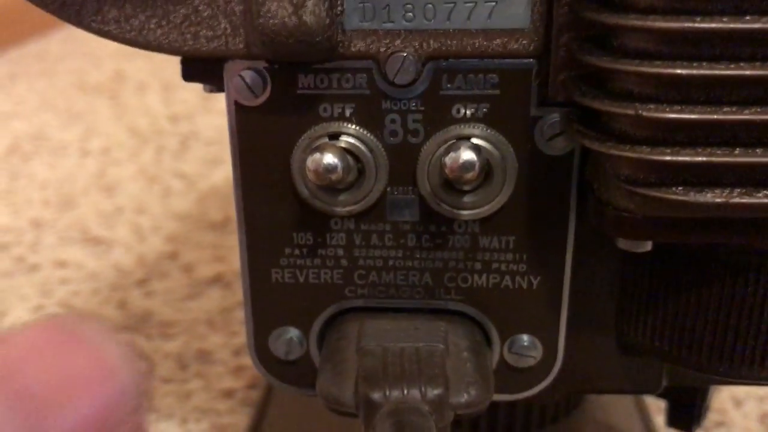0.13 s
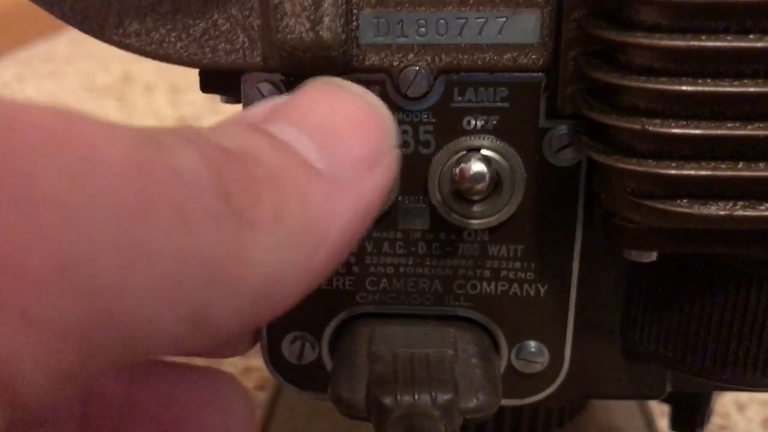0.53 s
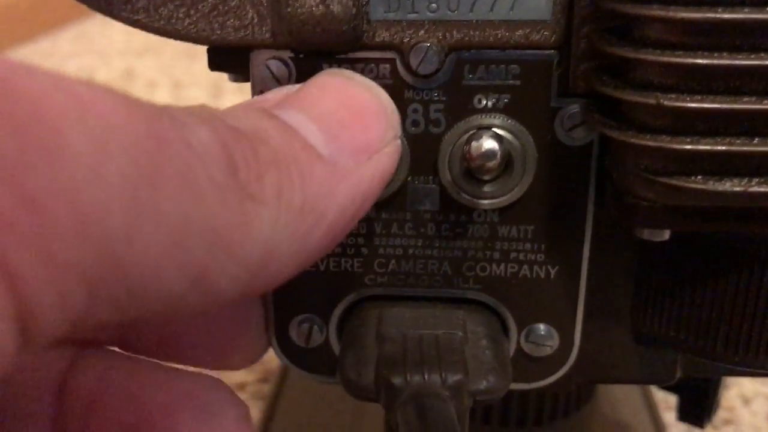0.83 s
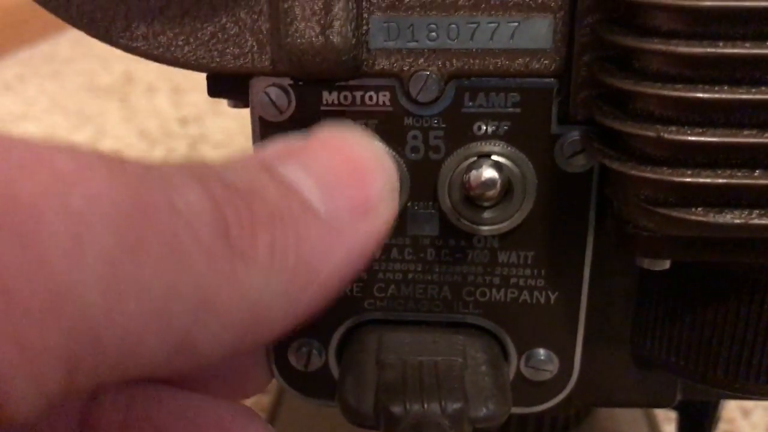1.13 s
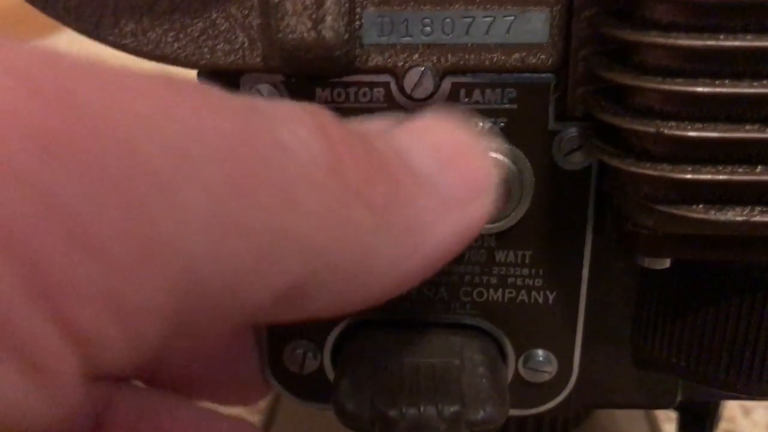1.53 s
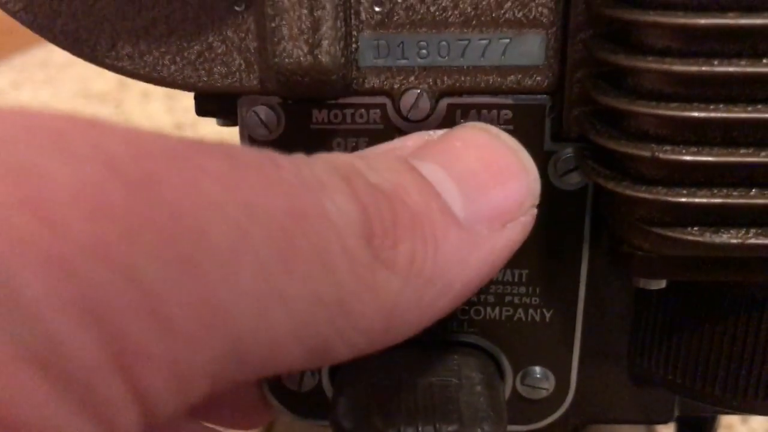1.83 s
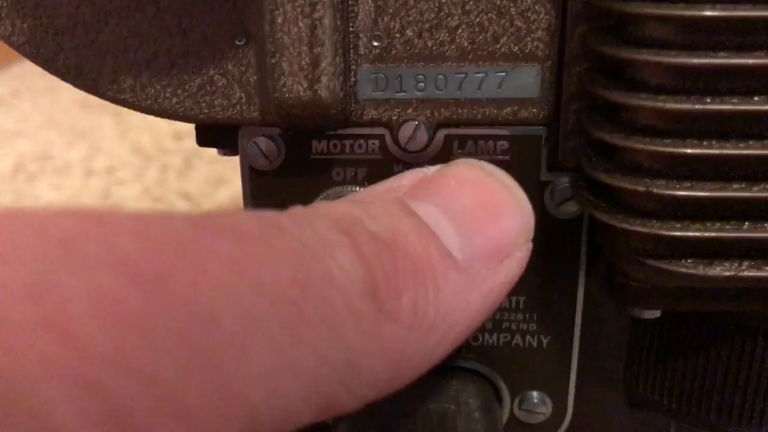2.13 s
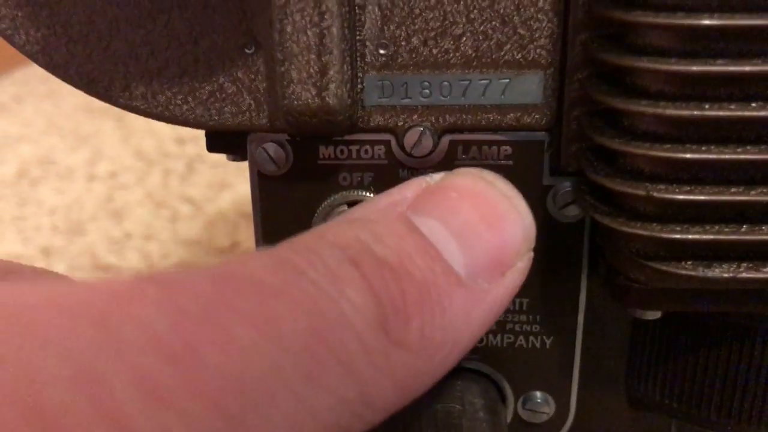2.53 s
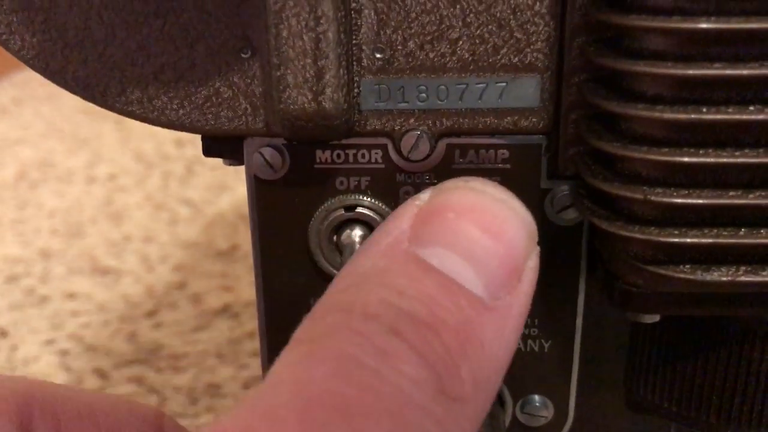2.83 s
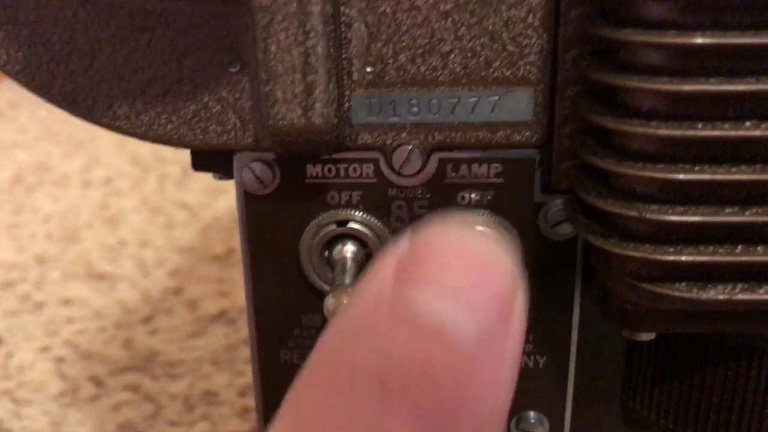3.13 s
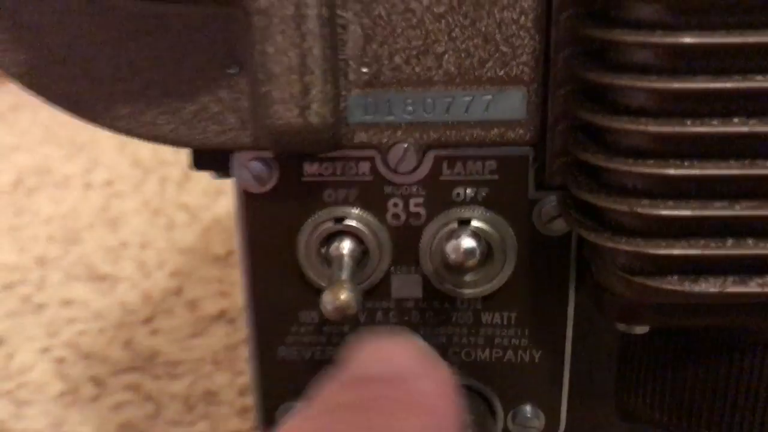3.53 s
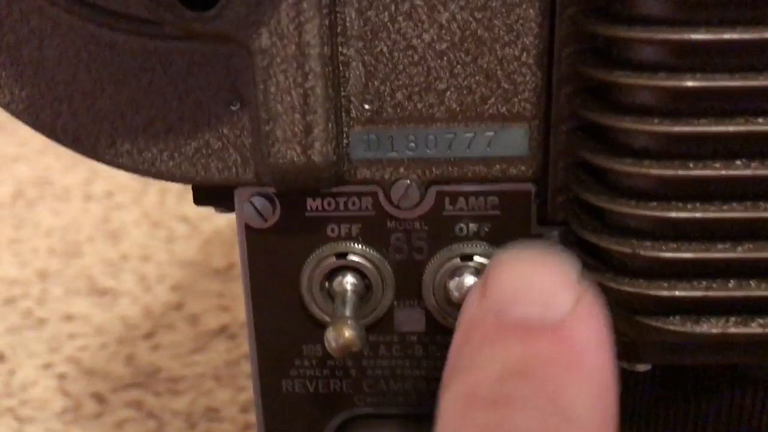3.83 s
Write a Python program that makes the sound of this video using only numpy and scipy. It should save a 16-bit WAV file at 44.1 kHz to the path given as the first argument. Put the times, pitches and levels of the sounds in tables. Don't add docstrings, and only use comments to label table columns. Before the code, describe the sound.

Near silence with light ticks, then a hard switch click; a small electric motor whirs up, its dry belt chirping rapidly, and holds a rough, steady whir, heard very close in a quiet room.

```python
import sys
import numpy as np
from scipy import signal
from scipy.fft import rfft, irfft
from scipy.io import wavfile

SR = 44100
rng = np.random.default_rng(int(sys.argv[2]) if len(sys.argv) > 2 else 0)


def master_out(mix):
    frames = np.transpose(np.atleast_2d(mix))
    ceiling = np.clip(frames, -1, 1)
    pcm = np.round(ceiling * 32767).astype(np.int16)
    wavfile.write(sys.argv[1], SR, pcm)


def invert_db(x):
    u = np.asarray(x, float) / 20
    return 10 ** u


N = 176400

START_S, TOP_HZ = 1.3046, 100.24


def at_hz(points, hz):
    table_hz, values = np.array(points).T
    return np.interp(np.log(hz), np.log(table_hz), values)


def rms_one(x):
    return x / np.sqrt(np.mean(x ** 2) + 1e-20)


def drift(rate_hz):
    r = np.exp(-80 * np.pi * rate_hz / SR)
    slow = signal.lfilter([1], [1, -2 * r, r * r], rng.standard_normal(N // 40 + 2002))[2000:]
    return np.interp(np.arange(N) / 40, np.arange(len(slow)), rms_one(slow))


def coloured(points, peaks=()):
    hz = np.maximum(np.arange(N // 2 + 1) * SR / N, 1)
    db = at_hz(points, hz)
    for centre, width, gain_db in peaks:
        db = db + gain_db / (1 + (2 * (hz - centre) / width) ** 2)
    white = rfft(rng.standard_normal(N))
    noise = irfft(white * invert_db(db) * (hz > 15), N)
    return hz, rfft(rms_one(noise))


def butter(x, order, hz, kind):
    return signal.sosfilt(signal.butter(order, hz, kind, fs=SR, output="sos"), x)


def ring(clicks, hz, t60):
    r, w = invert_db(-60 / (t60 * SR)), 2 * np.pi * hz / SR
    return signal.lfilter([0, np.sin(w)], [1, -2 * r * np.cos(w), r * r], clicks + 1e-18)


def room_hush():
    # f/Hz, level/dB per Hz
    murmur = [(22, -43), (62, 4), (95, -18.5), (130, -9), (170, -18.5), (400, -25), (1000, -32),
              (16000, -40)]
    _, spectrum = coloured(murmur, [(10600, 900, -8)])
    level_db = -63 - 2.5 * np.arange(N) / SR
    return invert_db(level_db) * irfft(spectrum, N)


def switch():
    # t/s, level/dB, length/s
    snaps = [
        (.139, -57, 0.0011),
        (.611, -62, .001),
        (1.2503, -56, .0015),
        (1.2518, -45.5, .001),
        (1.263, -50, .002),
        (1.2705, -39, .002),
        (1.2735, -3.5, 0.00077),
        (1.2747, -3, 0.00081),
        (1.2759, -7.5, 0.00079),
        (1.2778, -20, 0.00083),
    ]
    # f/Hz, level/dB, time to die by 60 dB/s
    plate_modes = [(565, -1, 0.04), (836, -18, 0.05), (1153, 0, 0.043), (1470, -2.5, 0.024),
                   (2164, 1, 0.02), (3490, -11, 0.031), (4190, -12.5, 0.016), (4940, -0.5, 0.013),
                   (5810, 7.5, 0.0051), (6460, 7, 0.0068), (7230, -3, 0.025), (8380, -11, 0.01),
                   (9400, 0, 0.0092), (11040, 2, 0.0075)]
    crack_db, tail_db, tail_t60_s = -1.5, -45, 0.28
    t = np.arange(N) / SR
    loudness, clicks = np.zeros(N), np.zeros(N)
    for s, db, length in snaps:
        loudness += invert_db(db) * (t >= s) * np.exp(-np.maximum(t - s, 0) / length)
        clicks[int(s * SR)] = invert_db(db)
    burst = rng.standard_normal(N) * loudness
    plate = sum(invert_db(db - 14.5) * ring(clicks, hz, t60) for hz, db, t60 in plate_modes)
    crack = invert_db(crack_db) * butter(burst, 2, [3200, 11000], "band")
    direct = butter(plate + crack, 6, 470, "high")
    tail = signal.lfilter([.5], [1, -.5], rng.standard_normal(SR // 2))
    tail = tail * invert_db(-60 * t[:SR // 2] / tail_t60_s)
    into_room = .5 * direct + butter(burst, 2, [500, 9000], "band")
    return direct + invert_db(tail_db) * signal.fftconvolve(into_room, tail)[:N]


def hand():
    # t/s, length/s, level/dB
    brushes = [
        (.66, .05, -80),
        (.9, 0.053, -72),
    ]
    # t/s, level/dB, f/Hz
    bumps = [
        (2.64, -37, 125),
        (2.66, -39, 81.5),
        (3.17, -42, 69),
        (3.4, -38.5, 143.5),
    ]
    t = np.arange(N) / SR
    thuds, rubbing = np.zeros(N), np.zeros(N)
    for s, db, hz in bumps:
        thuds += invert_db(db) * np.exp(-((t - s) / 0.045) ** 2) * np.sin(2 * np.pi * hz * t)
    for s, length, db in brushes:
        rubbing += invert_db(db) * np.exp(-(2 * (t - s) / length) ** 4)
    return thuds + rng.standard_normal(N) * rubbing


def shaft():
    runup_s, creep_from_s, creep_hz_per_s = .315, 2.3, .9
    t = np.arange(N) / SR
    runup = TOP_HZ * (1 - np.exp(-np.maximum(t - START_S, 0) / runup_s))
    speed = runup + creep_hz_per_s * np.maximum(t - creep_from_s, 0)
    return speed, np.cumsum(speed) / SR


def casing_knocks():
    per_s, hz = 17, 1058
    hits = (rng.random(N) < per_s / SR) * rng.standard_normal(N) * invert_db(2)
    return ring(hits, hz, 0.032) - 0.68 * ring(hits, 1.75 * hz, .015) + 0.48 * ring(hits, 3.1 * hz, .008)


def fan(speed, turns):
    # t/s, level/dB
    air = [(1.33, -44.5), (1.46, -32.5), (1.66, -26), (1.88, -24.5), (2.02, -23.5), (2.03, -22.5),
           (2.04, -23), (3.98, -22.5), (4.0, -22.5)]
    # f/Hz, level/dB per Hz
    air_colour = [(30, -28.5), (90, -17), (300, -15.5), (700, -10), (1600, -11), (3000, -19.5),
                  (7000, -17.5), (16000, -30.5)]
    # f/Hz, extra loss/dB per dB of missing speed
    speed_share = [(60, 1), (300, 0.13), (1000, 0.07), (2500, 0.52), (6000, 0.85), (14000, 0.81)]
    # f/Hz, width/Hz, level/dB
    casing = [(1049, 410, 10), (1850, 100, 2.5), (3585, 420, 6), (4380, 100, -10.5), (5350, 150, -2.5),
              (5830, 1000, 5.5), (6600, 630, -2), (7740, 590, -7.5), (9600, 620, 1.5), (10520, 510, -6)]
    patchy_db, beat = 0.63, 0.083
    t = np.arange(N) / SR
    level_db = np.interp(t, *np.transpose([(START_S - .02, -95)] + list(air)))
    lack_db = 20 * np.log10(np.maximum(speed, 8) / TOP_HZ)
    hz, spectrum = coloured(air_colour, casing)
    stream, shared = np.zeros(N), drift(3.6)
    for k in range(10):
        place = np.clip(np.log2(hz / 31.25) - k, -1 if k else 0, 1 if k < 9 else 0)
        band = irfft(spectrum * np.cos(np.pi / 2 * place) ** 2, N)
        flicker_db = patchy_db * (0.37 * shared + drift(31))
        stream += band * invert_db(at_hz(speed_share, 40.0 * 2 ** k) * lack_db + flicker_db)
    beating = 1 + beat * np.cos(2 * np.pi * turns)
    return invert_db(level_db) * (stream * beating + casing_knocks())


def tones(speed, turns):
    # cycles per turn, level/dB rms, favoured shaft speed/Hz, width of that favour/Hz
    hums = [(1, -49, 98, 30), (8, -41, 88, 13), (8.3, -36, 70, 8), (12, -42, 82, 18), (16.67, -37, 83, 7),
            (20.4, -41, 90, 8), (22.8, -45, 93, 9), (24, -35.5, 85, 8.5), (25.42, -38, 81, 8),
            (32, -51, 80, 12), (36, -50, 66, 16), (48, -52, 46, 10)]
    waver_db, jitter, jitter_rate_hz = 1.6, .45, 10
    out = np.zeros(N)
    for per_turn, db, best, width in hums:
        level = np.sqrt(2) * invert_db(db + waver_db * drift(13.5))
        swell = speed / best / (1 + ((speed - best) / width) ** 2)
        out += level * swell * np.sin(2 * np.pi * per_turn * turns + jitter * drift(jitter_rate_hz))
    return out


def faint_squeaks(turns):
    count = np.arange(21, int(turns[-1]) - 1)
    luck = rng.standard_normal((len(count), 2))
    start_s = np.searchsorted(turns, count + .15) / SR
    db = -35 - .025 * count + 4 * luck[:, 0]
    return np.c_[start_s, db, 14900 + 600 * luck[:, 1]]


def squeaks(speed, turns):
    # t/s, peak level/dB, centre f/Hz
    strong = [(1.4007, -44, 12900), (1.4247, -22.5, 14000), (1.4546, -20, 12900), (1.479, -17, 13200),
              (1.502, -19, 14000), (1.5209, -18, 12500), (1.541, -20, 13000), (1.5604, -21, 14000),
              (1.5775, -19, 12400), (1.5944, -23, 13300), (1.6247, -20.5, 12900), (1.6414, -26, 13400),
              (1.6576, -26, 13700), (1.6711, -25, 13200), (1.6864, -27, 14100), (1.6995, -24, 14500),
              (1.713, -21.5, 13600), (1.7274, -26, 13100), (1.7414, -28, 13000), (1.7534, -24, 13300),
              (1.7789, -25, 13000), (1.7923, -22, 13100), (1.8542, -27, 13300), (1.8657, -26, 13300),
              (1.8896, -22, 13200), (1.9255, -21, 13300), (1.9599, -25, 15300), (1.9934, -24, 15200),
              (2.0268, -27, 13200), (2.1141, -25, 14000)]
    length_turns, lead, rise_hz, rough_hz, level_db = .33, .2, 2200, 1300, -2.5
    echo_db, echo_t60_s = -36.5, 0.13
    rough = rms_one(butter(rng.standard_normal((2, N)), 2, rough_hz, "low"))
    out = np.zeros(N)
    for s, db, hz in list(strong) + list(faint_squeaks(turns)):
        i = int(s * SR)
        n = int(length_turns * SR / max(speed[i], 30))
        i -= int(lead * n)
        u = np.arange(3 * n) / n
        shape = np.minimum(u / 0.34, 1) * (np.exp(-u ** 4) + .12 * np.exp(-u))
        phase = 2 * np.pi * np.cumsum(hz + rise_hz * (np.minimum(u, 1.2) - .5)) / SR
        rough_a, rough_b = rough[:, i - n:i + 2 * n]
        chirp = (0.73 + 0.48 * rough_a) * np.sin(phase) + 0.48 * rough_b * np.cos(phase)
        out[i:i + 3 * n] += (invert_db(db + level_db) * shape * chirp)[:N - i]
    out = butter(out, 3, 11600, "high")
    echo = rng.standard_normal(SR // 4) * invert_db(-60 * np.arange(SR // 4) / SR / echo_t60_s)
    return out + invert_db(echo_db) * signal.fftconvolve(out, echo)[:N]


def unshaded():
    away_s, level_db = 3.22, -47
    hiss = rms_one(butter(rng.standard_normal(N), 2, [7300, 8700], "band"))
    opening = np.clip((np.arange(N) / SR - away_s) / .08, 0, 1)
    return invert_db(level_db) * hiss * opening


def scene():
    speed, turns = shaft()
    motor = fan(speed, turns) + tones(speed, turns) + squeaks(speed, turns)
    return (room_hush() + switch() + hand() + motor + unshaded())[None]


def band_limit(x):
    return signal.sosfilt(signal.butter(12, 16860, fs=SR, output="sos"), x)


def record(dry):
    rounded = 0.74 * np.tanh(dry / 0.76)
    treble_cut = signal.cheby2(16, 60, 16200, fs=SR, output="sos")
    return band_limit(signal.sosfilt(treble_cut, rounded))


dry = scene()
out = record(dry)
master_out(out)
```